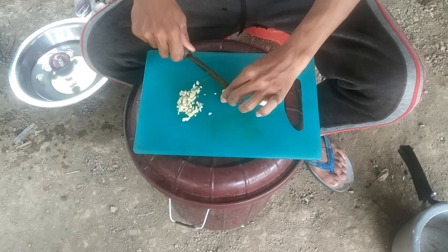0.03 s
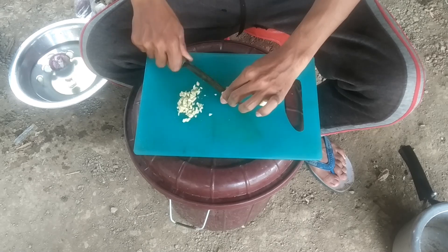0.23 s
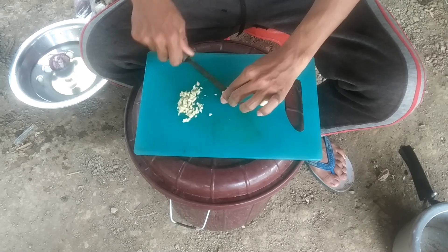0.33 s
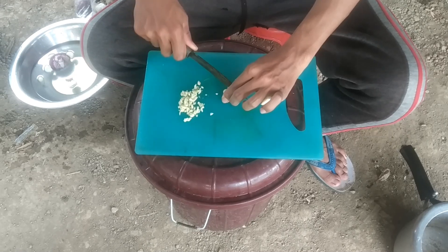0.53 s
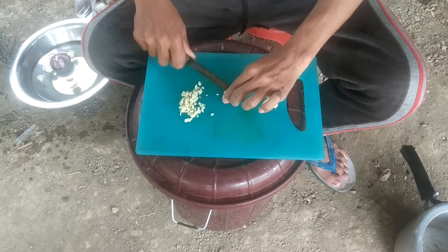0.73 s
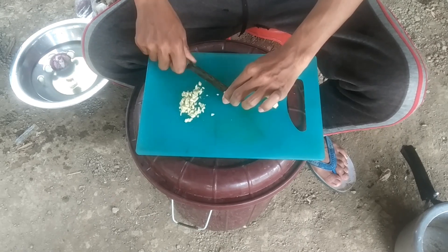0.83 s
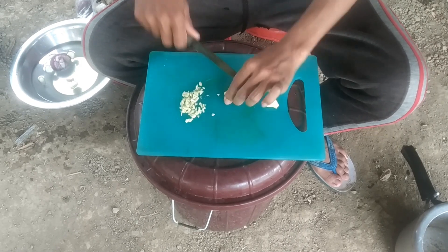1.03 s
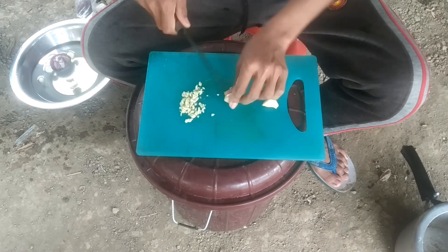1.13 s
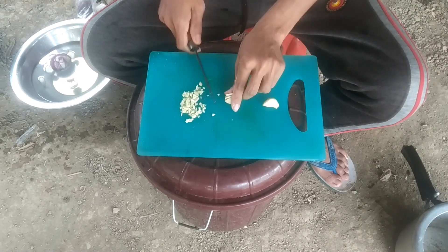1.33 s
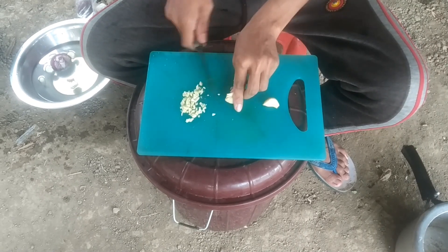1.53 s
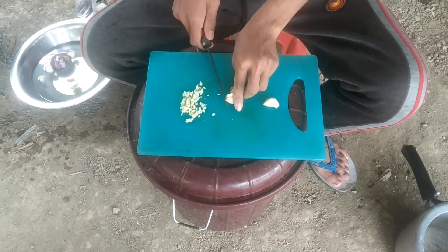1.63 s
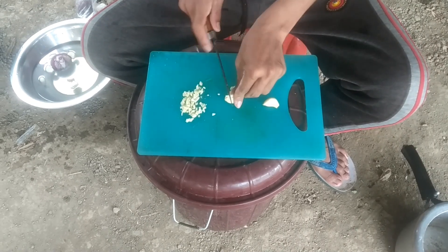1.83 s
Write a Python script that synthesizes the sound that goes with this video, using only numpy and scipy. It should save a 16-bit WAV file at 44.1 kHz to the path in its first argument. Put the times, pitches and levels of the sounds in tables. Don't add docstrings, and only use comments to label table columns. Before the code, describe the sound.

A knife chops garlic on a plastic board over a hollow bin, close up in a quiet yard with a low hum. At 0.1-0.16 s it crunches, snaps skin and knocks sharply. A far fowl moans faintly, falling, at 0.3-0.55 s, before a soft thump. Crunching at 0.67 leads to a loud hollow crack at 0.76 and a fading scrape. Light taps and rustles come at 1.42 and 1.58-1.7 s.

```python
import sys
import numpy as np
from scipy import signal
from scipy.fft import rfft, irfft, next_fast_len
from scipy.io import wavfile
from scipy.ndimage import map_coordinates

SR = 44100
rng = np.random.default_rng(int(sys.argv[2]) if len(sys.argv) > 2 else 0)


def to_wav(s):
    ch = np.atleast_2d(s).T
    pcm = np.round(np.clip(ch, -1, 1) * 32767)
    wavfile.write(sys.argv[1], SR, pcm.astype(np.int16))


def natural_amplitude(level_db):
    exponent = np.asarray(level_db, float) / 20
    return 10 ** exponent


N = 83790


def unit(x):
    return x / np.sqrt(np.mean(x ** 2) + 1e-20)


def along(points, hz):
    f, v = np.transpose(points)
    return np.interp(np.log(hz + 1), np.log(f + 1), v)


def wobble(rate):
    knots = rng.standard_normal(int(N * rate / SR) + 4)
    return map_coordinates(knots, [np.arange(N) * rate / SR])


def filtered(x, response):
    m = next_fast_len(N + SR // 2)
    return irfft(rfft(x, m) * response(np.fft.rfftfreq(m, 1 / SR)), m)[..., :N]


def pair(gain, alike):
    def mid_and_side(hz):
        turn = np.arccos(np.clip(along(alike, hz), -1, 1)) / 2
        return gain(hz) * [np.cos(turn), np.sin(turn)]

    mid, side = filtered(rng.standard_normal((2, N)), mid_and_side)
    return unit(np.array([mid + side, mid - side]))


def shape(start, length, rise, t60):
    t = np.arange(N) / SR - start
    release = natural_amplitude(-60 * np.clip(t - length, 0, None) / t60)
    return np.clip(t / rise, 0, 1) ** 2 * release


# pitch_hz, level_db (dB per Hz)
HUM_COLOUR = [(12, -38.5), (25, 3.5), (120, -12), (700, -19), (1100, -25), (10500, -27.5), (11800, -32.5),
              (15300, -28.5)]
# pitch_hz, likeness (0 to 1)
HUM_ALIKE = [(60, 0.84), (640, 0.84), (1400, 0)]
# time_s, level_db
RUSTLE_LEVEL = [(0.0, -64), (0.618, -65), (1.9, -68.5)]
HUM_DB, TRAFFIC_SWAY_DB, TRAFFIC_SWAYS_PER_S, RUSTLE_FROM_HZ = -56, 1.3, 7, 900


def hum():
    s, db = np.transpose(RUSTLE_LEVEL)
    high = lambda hz: hz ** 2 / (hz ** 2 + RUSTLE_FROM_HZ ** 2)
    steady = natural_amplitude(HUM_DB) * pair(lambda hz: natural_amplitude(along(HUM_COLOUR, hz)), HUM_ALIKE)
    sway = natural_amplitude(TRAFFIC_SWAY_DB * wobble(TRAFFIC_SWAYS_PER_S))
    swell = natural_amplitude(np.interp(np.arange(N) / SR, s, db - db.mean()) + 0.44 * wobble(16))
    return sway * filtered(steady, lambda hz: 1 - high(hz)) + swell * filtered(steady, high)


# time_s, pitch_hz, level_db
FOWL_CALL = [
    (0.291, 610, -60),
    (0.359, 583, -58.5),
    (.42, 554, -61),
    (0.469, 517, -59),
    (0.531, 462, -59.5),
    (.56, 480, -80),
]
OVERTONE_DB = -1.5


def fowl():
    s, hz, db = np.transpose(FOWL_CALL)
    t = np.arange(N) / SR
    pitch = np.interp(t, s, hz) * (1 + 0.029 * wobble(119.6))
    turn = 2 * np.pi * np.cumsum(pitch) / SR
    level = natural_amplitude(np.interp(t, s, db, -140, -140))
    note = natural_amplitude(2.9 * wobble(30.1) - 2.5) * np.sin(turn)
    swell = np.sin(np.pi * np.clip((t - s[0]) / (s[-1] - s[0]), 0, 1)) ** 2
    unsteady = natural_amplitude(OVERTONE_DB + 3.5 * np.array([wobble(23.7), wobble(43.5)]))
    octave = swell * unsteady * np.sin(2 * turn + [[0], [1.5]])
    return level * (note + octave)


# pitch_hz, t60_s
YARD_ECHO = [(300, 0.27), (2000, 0.26), (10000, 0.058)]
YARD_DB = -17.5


def yard(x):
    hz, t, z = signal.stft(rng.standard_normal((2, SR // 2)), SR, nperseg=256)
    fading = z * natural_amplitude(-60 * t / along(YARD_ECHO, hz)[:, None])
    tail = signal.istft(fading, SR, nperseg=256)[1]
    late = np.pad(x, ((0, 0), (200, 0)))
    return signal.fftconvolve(late, tail / np.linalg.norm(tail[0]), axes=1)[:, :N]


BOARD_LOW_HZ = 236


def small(hz):
    return (1j * hz / (BOARD_LOW_HZ + 1j * hz)) ** 2


# pitch_hz, width_hz, level_db
BOARD_MODES = [(707, 279, 4.5), (1908, 210, 1.5), (2507, 350, 1.5)]
# pitch_hz, level_db, t60_s
LID_MODES = [(310, -11.5, 0.073), (373, -16, 0.074), (480.6, -13, 0.11), (537, -15.5, 0.14),
             (634.8, -3, 0.12), (691, -12, 0.06), (769.4, -18, 0.13), (850, -18.5, 0.1),
             (1358, -9.5, 0.033), (1676, -14, 0.14), (1930, -18.5, 0.06), (2350, -13, 0.05),
             (2706, -11.5, 0.066), (3200, -20.5, .08)]
# pitch_hz, level_db, t60_s
BIN_MODES = [(100.6, -7, 0.25), (168.2, -4.5, 0.083), (77.8, -5.5, 0.11)]


def body(hz, bin_db=-10):
    def peak(c, w, db):
        return natural_amplitude(db) * 1j * hz * w / (c * c - hz * hz + 1j * hz * w)

    def slow(modes):
        return sum((-1) ** k * peak(c, np.log(1000) / np.pi / t60, db + 9.5)
                   for k, (c, db, t60) in enumerate(modes))

    quick = sum((-1) ** k * peak(c, w, db) for k, (c, w, db) in enumerate(BOARD_MODES))
    return (quick + slow(LID_MODES)) * small(hz) + natural_amplitude(bin_db) * slow(BIN_MODES)


# pitch_hz, likeness (0 to 1)
NEAR_LIKENESS = [(300, 1), (800, .85), (2000, 0.05)]


def pushed(envelope, response):
    force = envelope * pair(lambda hz: 1 + 0 * hz, NEAR_LIKENESS)
    strength = np.linalg.norm(response(np.linspace(0, SR / 2, 4096)) / 64)
    return filtered(force, response) / strength


# start_s, length_s, level_db, centre_hz
BOARD_HISSES = [(0.162, 0.031, -42, 2120), (0.154, 0.021, -46, 4700), (1.421, .008, -62, 4200),
                (1.426, 0.018, -50.5, 1900), (1.58, 0.015, -64, 4330), (1.585, .01, -56, 1620),
                (0.162, 0.014, -43, 6800), (0.31, 0.22, -65.5, 2280), (0.58, 0.024, -77, 10750),
                (1.16, 0.046, -59, 4040), (1.197, 0.057, -61.5, 8640), (1.203, 0.048, -62, 2850),
                (1.307, 0.046, -64.5, 3500), (1.3, 0.0095, -66, 8400), (1.58, 0.032, -61, 2470),
                (1.624, 0.046, -56, 3790), (1.638, 0.052, -65, 2350), (1.784, 0.042, -67.5, 3800)]
RUB_WIDTH = 0.23


def rubs():
    out = np.zeros((2, N))
    for s, length, db, centre in BOARD_HISSES:
        band = lambda hz: np.exp(-.5 * (np.log((hz + 1) / centre) / RUB_WIDTH) ** 2)
        level = natural_amplitude(db + 1.3 * wobble(120)) * shape(s, length, 0.0067, 0.18)
        out += level * pair(band, [(3000, 0.045)])
    return out


# time_s, peak_db, pitch_hz, t60_s
HELD_NOTES = [(.102, -34, 635, 0.22), (0.105, -43, 480, .15), (.163, -27, 634, 0.17),
              (.192, -36, 626, 0.24), (0.55, -40.5, 129, .12), (.556, -38.5, 660, 0.035),
              (.58, -50, 630, 0.07), (0.14, -53.5, 100, 0.13), (0.67, -40.5, 68, 0.2),
              (.68, -39.5, 380, 0.099), (0.74, -41, 440, 0.23), (.766, -19.5, 629.4, 0.062),
              (.782, -18.5, 630, 0.067), (.811, -28, 630, .2), (.811, -33, 803, .1),
              (.795, -31.5, 450, 0.13), (.815, -36, 385, 0.14), (.838, -37.5, 616, 0.29),
              (.762, -29, 796, 0.051), (0.78, -28, 330, 0.081), (.766, -22, 457.3, 0.082),
              (0.767, -42.5, 91.8, 0.42), (1.426, -35, 315, 0.078), (1.424, -28, 649, 0.11),
              (1.464, -40.5, 654.5, 0.13), (1.424, -34, 463, 0.071), (1.582, -43.5, 640, 0.1),
              (1.61, -42.5, 650, 0.11), (1.57, -44.5, 310, 0.11), (1.62, -49, 310, 0.11),
              (1.683, -50, 625, 0.089)]
NOTE_RISE_S, NOTE_WAVER_DB = 0.0019, 2.5
WAVER = 1


def notes():
    out, t = np.zeros(N + SR), np.arange(SR // 2) / SR
    for s, db, hz, t60 in HELD_NOTES:
        drift = WAVER * np.cumsum(rng.standard_normal(len(t))) * np.sqrt(hz / 10 / SR)
        tone = np.sin(2 * np.pi * hz * t + drift) * (1 - np.exp(-t / NOTE_RISE_S))
        out[round(s * SR):][:len(t)] += natural_amplitude(db - 60 * t / t60) * tone
    return out[:N] * natural_amplitude(NOTE_WAVER_DB * wobble(60.37))


# time_s, force_db, contact_ms, bin_thump_db, crack_db
BOARD_KNOCKS = [
    (.1552, -9, 0.13, -23.5, -14),
    (0.5555, -27.5, 0.61, -14, -50),
    (.7612, -18, 0.1, -23, -7.5),
    (1.4223, -22.5, 0.29, -25.5, -26),
    (1.5812, -30.5, 0.54, -42, -25.5),
]
# pitch_hz, level_db (dB per Hz)
CRACK_COLOUR = [(1000, -5.5), (2500, 14), (5000, 3.5), (10500, -2.5), (12500, -11.5), (16000, -33)]
LID_DB, SCATTER_DB = -8, 5
PRESS_S, LET_GO_T60 = .0034, .007
RATTLE_DB, RATTLE_T60 = -17.5, 0.074
LEAD_MS = 0.1


def knocks():
    board, air, t = np.zeros((2, N + SR)), np.zeros((3, N + SR)), np.arange(SR // 2) / SR

    def ring(modes):
        out = np.zeros(len(t))
        for hz, db, t60 in modes:
            drift = WAVER * np.cumsum(rng.standard_normal(len(t))) * np.sqrt(60 / SR)
            level = natural_amplitude(db + rng.normal(0, SCATTER_DB) - 60 * t / t60)
            out += level * np.sin(2 * np.pi * hz * t + drift)
        return out

    pressed = natural_amplitude(-60 * np.clip(t - PRESS_S, 0, None) / LET_GO_T60)
    quick = -pressed * sum((-1) ** k * natural_amplitude(g) * np.exp(-w * t) * np.sin(2 * np.pi * c * t)
                           for k, (c, w, g) in enumerate(BOARD_MODES))
    for s, db, ms, thump_db, crack_db in BOARD_KNOCKS:
        push = t[:400] * np.exp(-t[:400] / (ms * 0.00048))
        push = push / push.sum()
        at = slice(round(s * SR), round(s * SR) + len(t))
        struck = quick + natural_amplitude(LID_DB) * ring(LID_MODES)
        board[0, at] += natural_amplitude(db) * np.convolve(struck, push)[:len(t)]
        board[1, at] += natural_amplitude(db + thump_db) * ring(BIN_MODES) * (1 - np.exp(-t / 0.0034))
        air[:2, at] += natural_amplitude(db + crack_db) * pressed * rng.standard_normal((2, len(t)))
        air[2, at] += natural_amplitude(db + RATTLE_DB - 3.8 * ms - 60 * t / RATTLE_T60)
    direct = filtered(board[0, :N], small) + board[1, :N]
    lead = lambda hz: np.exp(np.outer([1, -1], 1j * np.pi * hz * LEAD_MS / 1000))
    crack = filtered(air[:2, :N], lambda hz: natural_amplitude(along(CRACK_COLOUR, hz)))
    rattle = pushed(air[2, :N], body)
    return filtered(direct, lead) + crack + rattle


# pitch_hz, level_db (dB per Hz)
SKID_COLOUR = [(700, -13), (1200, -13), (1900, 5.5), (4300, -8.5), (7600, -4.5), (10900, -17.5),
               (11700, -55), (15500, -70)]
SKID_S, SKID_HOLD_S, SKID_T60 = .762, 0.032, 0.45
SKID_END_S, SKID_END_T60 = 0.8, 0.74
SKID_DB, SKID_PUSH_DB = -27, -32.5


def skid():
    slowing = shape(SKID_S, SKID_HOLD_S, 0.00073, SKID_T60)
    lifting = shape(0, SKID_END_S, .001, SKID_END_T60)
    speed = slowing * lifting * natural_amplitude(0.44 * wobble(400))
    scrape = natural_amplitude(SKID_DB) * speed * pair(lambda hz: natural_amplitude(along(SKID_COLOUR, hz)), [(3000, 0)])
    return scrape + pushed(natural_amplitude(SKID_PUSH_DB) * speed, body)


SNAP_TIMES = [.1035, .1045, .106, .144, .5256, .5258, .557, .6805, .729, 1.333, 1.424, 1.5592, 1.5602,
              1.644, 1.685]
# peak_db, pitch_hz, t60_s
SKIN_SNAPS = [(-29, 3900, .03), (-19, 10600, 0.014), (-32.5, 3000, 0.02005), (-15, 10100, .013),
              (-27, 9330, 0.0062), (-39.5, 3900, 0.018), (-37, 3850, 0.024), (-21, 3900, 0.033),
              (-38, 4150, .015), (-50.5, 1466, 0.067), (-31, 4000, 0.013), (-26, 13060, 0.0021),
              (-13, 9100, 0.0025), (-36.5, 2400, 0.024), (-44, 2450, 0.017)]


def snaps():
    out, t = np.zeros(N + SR), np.arange(SR // 8) / SR
    for s, (db, hz, t60) in zip(SNAP_TIMES, SKIN_SNAPS):
        spread = np.clip(3 / t60 / hz, 0, .3)
        beating = (1 + np.cos(2 * np.pi * hz * spread * t)) / 2
        tone = np.sin(2 * np.pi * hz * t) * beating * (1 - np.exp(-t / 0.00034))
        out[round(s * SR):][:len(t)] += natural_amplitude(db - 60 * t / t60) * tone
    return np.array([out[:N], np.roll(out[:N], 6)])


# start_s, length_s, crunch_db, board_push_db
CLOVE_CUTS = [(0.096, 0.0059, -52, -46), (0.098, 0.0091, -40, -44), (0.106, 0.056, -53, -51.5),
              (0.137, 0.0074, -38, -34), (0.145, 0.014, -38, -43), (0.32, 0.018, -56, -59),
              (0.442, 0.029, -57.5, -60.5), (0.527, 0.017, -52.5, -58), (0.582, 0.011, -70, -57),
              (0.67, 0.0043, -60, -34.5), (0.673, 0.011, -40, -44), (0.68, 0.025, -55, -47.5),
              (0.725, 0.012, -44, -35.5), (0.74, 0.0265, -65, -57), (0.933, 0.02, -54.5, -55),
              (1.213, 0.015, -61, -60), (1.576, 0.017, -65, -48.5), (1.612, 0.017, -67, -54.5),
              (1.636, 0.015, -59, -52), (1.677, 0.005, -63.5, -50)]
# pitch_hz, level_db (dB per Hz)
CRUNCH_COLOUR = [(900, -46), (1800, -20.5), (3400, -4), (5800, -9), (9400, -2), (11500, -7.5), (15000, -14),
                 (16200, -48)]
CUT_RISE_S, CUT_T60, GRAINS_DB = 0.0049, 0.037, 4
SOFT_HZ, SOFT_BIN_DB = 790, -8


def cuts():
    crunch, push = np.zeros((2, N))
    for s, length, crunch_db, push_db in CLOVE_CUTS:
        crunch += natural_amplitude(crunch_db) * shape(s, length, min(CUT_RISE_S, length / 2), CUT_T60 * length / 0.006)
        push += natural_amplitude(push_db) * shape(s, length, CUT_RISE_S, 0.035)
    clumps = unit(natural_amplitude(GRAINS_DB * wobble(900)))
    bursts = pair(lambda hz: natural_amplitude(along(CRUNCH_COLOUR, hz)), [(3000, 0.18)])
    soft = lambda hz: body(hz, bin_db=SOFT_BIN_DB) / (1 + 1j * hz / SOFT_HZ) ** 2
    return crunch * clumps * bursts + pushed(push, soft)


def scene():
    near = knocks() + notes() + cuts() + snaps() + skid() + rubs()
    return near + natural_amplitude(YARD_DB) * yard(near) + fowl() + hum()


def roll_off(x):
    return signal.sosfilt(signal.butter(12, 16640, fs=SR, output="sos"), x)


# pitch_hz, left_over_right_db
PORT_BALANCE = [(200, -0.5), (500, 0.5), (2500, -2), (4500, 8), (6500, 5.5), (9500, 9), (12000, 6),
                (15000, 2.5)]
TOP_HZ = 16300


def record(dry):
    ports = lambda hz: natural_amplitude(np.outer([.5, -.5], along(PORT_BALANCE, hz))) * (hz < TOP_HZ)
    return roll_off(filtered(dry, ports))


dry = scene()
out = record(dry)
to_wav(out)
```